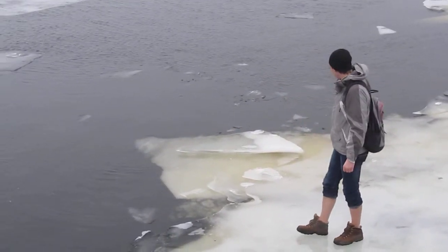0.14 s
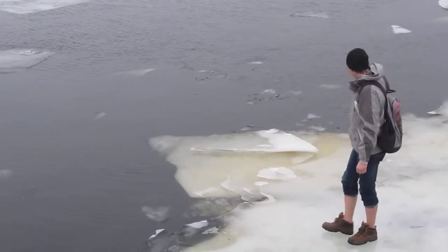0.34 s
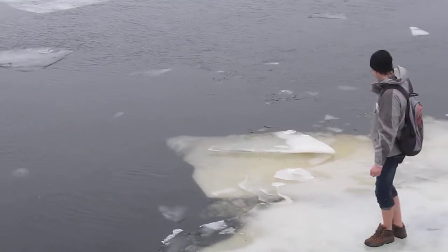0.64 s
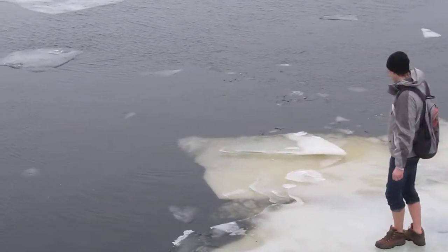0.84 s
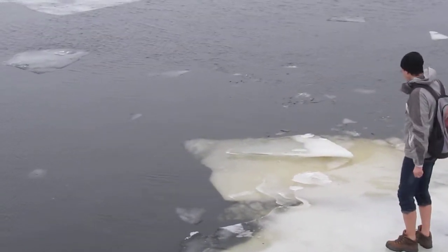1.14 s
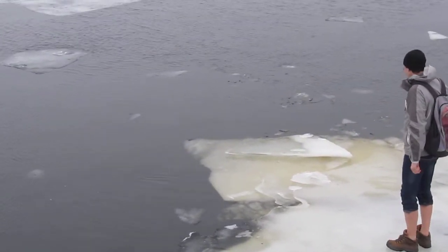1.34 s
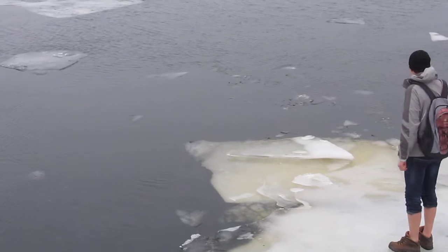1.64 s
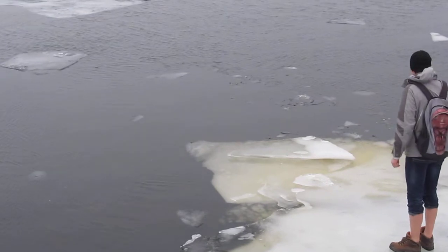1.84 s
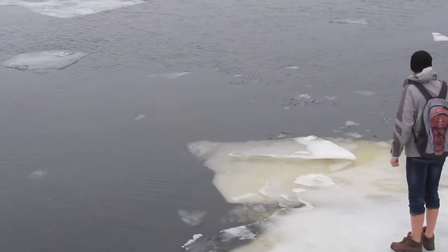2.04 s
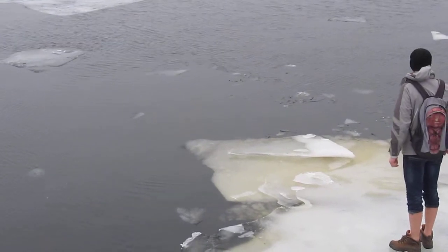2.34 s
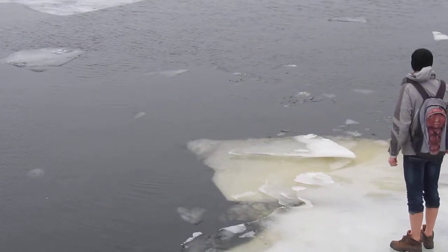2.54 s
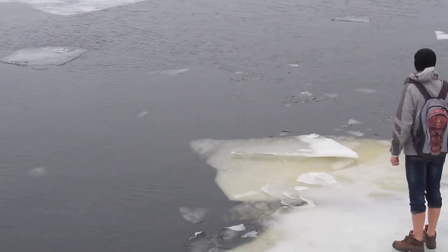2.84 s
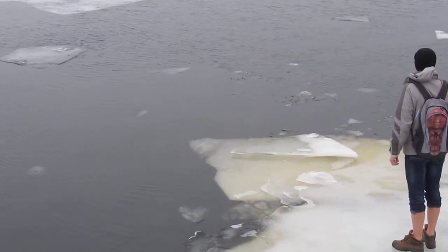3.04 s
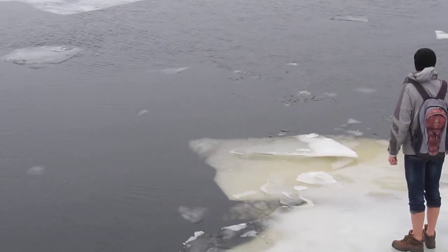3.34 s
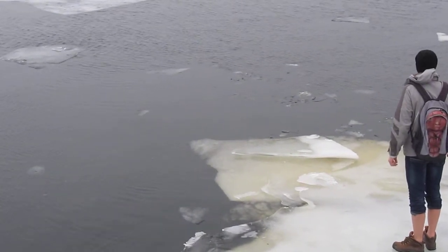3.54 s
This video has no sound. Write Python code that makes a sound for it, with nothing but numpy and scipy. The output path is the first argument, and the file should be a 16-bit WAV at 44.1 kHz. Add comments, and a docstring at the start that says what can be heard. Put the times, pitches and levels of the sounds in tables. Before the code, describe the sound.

Fluttering wind rumble with dull pops strikes the microphone throughout, strongest around the middle and again near the end. Outdoors by an icy river, soft hiss continues beneath, with barely audible gritty scuffs and ticks of ice underfoot.

```python
"""A light, gusty wind blows straight onto two microphone ports on an icy river bank.
At each port gusts and flurries shape coloured noise, and single eddies are short swings of pressure.
Underneath lie distant water and camera hiss as steady noise, and a thin camera whine of sine tones.
A walker's boots scuff the granular ice as gritty noise, and a few ice grains tick as short rings."""
import sys
import numpy as np
from scipy import signal
from scipy.fft import rfft, irfft
from scipy.io import wavfile

SR = 44100
rng = np.random.default_rng(int(sys.argv[2]) if len(sys.argv) > 2 else 0)


def log_audio(samples):
    """Write samples as a 16-bit WAV file to the path given in sys.argv[1]."""
    # one column per channel
    frames = np.atleast_2d(samples).T
    # limit to full scale, then quantise
    limited = np.clip(frames, -1, 1)
    pcm = np.round(limited * 32767).astype(np.int16)
    wavfile.write(sys.argv[1], SR, pcm)


N = 162288
T = np.arange(N) / SR


def undb(db):
    """Decibels to gain."""
    return 10 ** (np.asarray(db) / 20)


def noise():
    """White noise."""
    return rng.standard_normal(N)


def colour(x, points):
    """Shape a sound by (f/Hz, level/dB) points; white noise keeps its power."""
    hz, db = np.array(points, float).T
    bin_hz = np.arange(N // 2 + 1) * SR / N + 1e-9  # the offset avoids log(0)
    gain = undb(np.interp(np.log(bin_hz), np.log(hz), db))
    gain /= np.sqrt(np.mean(gain ** 2))
    return irfft(rfft(x) * gain, N)


def envelope_db(points):
    """Level in dB at every sample, joined by straight lines between (t/s, level/dB) points."""
    return np.interp(T, *np.array(points).T)


def flutter(spread_db, rate_per_s):
    """A quick random swelling of mean power 1."""
    knots = np.clip(rng.standard_normal(4096), -1.6, 1.6)
    gain = undb(spread_db * np.interp(T * rate_per_s, np.arange(len(knots)), knots))
    return gain / np.sqrt(np.mean(gain ** 2))


def near(at):
    """The samples within 20 ms of a moment."""
    return slice(*np.searchsorted(T, [at - .02, at + .02]))


CLEARING_S = 0.002  # time for which a strong eddy displaces the other turbulence


def clearing(port):
    """Gain of the turbulence, which gives way while a strong eddy covers the port."""
    gain = np.ones(N)
    for at, side, db, hz in STRONG_EDDIES:
        if side == port:
            span = near(at)
            gain[span] *= 1 - np.exp(-((T[span] - at) / CLEARING_S) ** 2)
    return gain


# slow gusts at each port, before the rumble and swirl gains: t/s, level/dB
GUSTS = {"L": [(0.0, -27), (0.24, -33), (0.62, -25), (0.94, -26.5), (1.12, -19.5), (1.32, -27.5),
         (1.48, -24), (1.58, -27), (1.94, -18), (2.04, -28.5), (2.16, -23.5), (2.35, -25.5), (2.495, -15),
         (2.57, -21.5), (2.83, -31), (2.99, -22), (3.51, -25), (3.68, -24)], "R": [(0.0, -36.5),
         (0.08, -23), (0.3, -32), (0.62, -32.5), (0.74, -25), (1.0, -20.5), (1.22, -26), (1.46, -14),
         (1.52, -22.5), (2.43, -24), (2.55, -22), (2.99, -26), (3.17, -27), (3.255, -19), (3.31, -26.5),
         (3.49, -29.5), (3.57, -21), (3.68, -28.5)]}
# short flurries of turbulence, before the flurry gain: t/s, port, level/dB, length/s
FLURRIES = [(0.087, "L", -25.5, 0.044), (1.146, "L", -30, 0.046), (1.473, "L", -31.5, 0.038),
            (1.825, "L", -29, 0.027), (2.788, "L", -24.5, 0.019), (2.933, "L", -26, 0.016),
            (0.067, "R", -26.5, 0.036), (0.226, "R", -25.5, 0.012), (0.354, "R", -26, 0.019),
            (0.428, "R", -20, 0.012), (0.532, "R", -22, .009), (0.74, "R", -27.5, 0.013),
            (0.908, "R", -24, 0.064), (1.013, "R", -33, 0.054), (1.423, "R", -17, 0.041),
            (1.448, "R", -11.5, 0.012), (1.849, "R", -24, 0.044), (2.034, "R", -26.5, 0.036),
            (2.206, "R", -22.5, 0.014), (2.308, "R", -22, 0.024), (2.59, "R", -16.5, 0.0095),
            (2.695, "R", -13.5, 0.018), (3.297, "R", -27.5, 0.011), (3.434, "R", -29.5, 0.03),
            (3.6, "R", -17, 0.016)]
# relative colour of the rumble at each port: f/Hz, level/dB per Hz
RUMBLE_COLOUR = {"L": [(15, -36.5), (40, -2.5), (85, 5.5), (170, 3), (300, -10), (550, -22.5), (900, -26),
                 (1400, -36.5), (2500, -63.5), (6000, -94.5)], "R": [(15, -33.5), (40, -18), (85, -6),
                 (200, -5.5), (330, -13.5), (550, -34), (900, -47.5), (1400, -47), (2500, -69.5),
                 (6000, -93)]}
# relative colour of swirl, flurries and wakes: f/Hz, level/dB per Hz
SWIRL_COLOUR = [(30, -32), (120, 1.5), (300, 5), (550, -3), (850, -10.5), (1300, -27), (2000, -40),
                (3500, -71.5)]
RUMBLE_DB, SWIRL_DB, FLURRY_DB = -1.5, -14, 3  # gains on the tabled levels
RUMBLE_FLUTTER_DB, SWIRL_FLUTTER_DB, FLUTTER_PER_S = 5.5, 7.5, 170
WAKE_DB, WAKE_S = -10, 0.0096  # turbulence trailing a strong eddy: level under its peak, decay time


def wind(port):
    """Gusts drive a deep rumble and a brighter, fitful swirl, which flurries and eddy wakes swell."""
    gust = undb(envelope_db(GUSTS[port]))
    rumble = colour(noise() * gust * flutter(RUMBLE_FLUTTER_DB, FLUTTER_PER_S), RUMBLE_COLOUR[port])
    swirl_power = (undb(SWIRL_DB) * gust) ** 2
    for at, side, db, length in FLURRIES:
        if side == port:
            swirl_power += undb(db + FLURRY_DB) ** 2 * np.exp(-(2 * (T - at) / length) ** 2)
    for at, side, db, hz in STRONG_EDDIES:
        if side == port:
            decay = np.exp(-2 * abs(T - at) / WAKE_S)
            swirl_power += undb(db + WAKE_DB) ** 2 * (T > at) * decay
    fitful = noise() * np.sqrt(swirl_power) * flutter(SWIRL_FLUTTER_DB, FLUTTER_PER_S)
    swirl = colour(fitful, SWIRL_COLOUR)
    return (undb(RUMBLE_DB) * rumble + swirl) * clearing(port)


# relative colour of the hush at each port: f/Hz, level/dB per Hz
HUSH_COLOUR = {"L": [(200, 10.5), (900, 0.5), (1600, -4), (2020, 3.5), (2290, -10.5), (2560, -2.5),
               (2860, -21), (3150, -12), (3400, -13.5), (3700, -9.5), (4050, -24.5), (4700, -21.5),
               (5100, -16), (5400, -5.5), (5620, -22), (5980, -12), (6350, -28.5), (6800, -30.5),
               (8500, -36), (10600, -43), (11400, -30.5), (13400, -39), (15500, -65.5)], "R": [(200, 7),
               (900, -9), (1350, -5.5), (1700, -11), (2200, -14), (3250, -21), (3750, -14), (4300, -23),
               (4900, -31.5), (5450, -18.5), (6200, -40.5), (6800, -32), (9500, -37), (11500, -36),
               (13400, -40), (15500, -63)]}
# slow swell added to the hush level: t/s, level/dB
HUSH_SWELL = [(0, -5), (.6, -2), (1.18, 2), (1.28, 0.5), (1.42, 1.5), (1.66, -0.5), (2.35, 2.5), (3.68, .5)]
HUSH_DB = {"L": -45.5, "R": -48.5}  # before the swell
HUSH_SHARED = 0.23  # share of the power common to both ports
HUSH_FLICKER_DB, HUSH_FLICKER_PER_S = 1.2, 45


def hush(port, river):
    """Distant water and the camera's own hiss, flickering a little, coloured by the port's resonances."""
    mixed = np.sqrt(HUSH_SHARED) * river + np.sqrt(1 - HUSH_SHARED) * noise()
    flickering = mixed * flutter(HUSH_FLICKER_DB, HUSH_FLICKER_PER_S)
    level = undb(HUSH_DB[port] + envelope_db(HUSH_SWELL))
    return level * colour(flickering, HUSH_COLOUR[port])


# camera whine at the right port: f/Hz, RMS level/dB
WHINE_TONES = [(7867, -81.5), (8107, -90.5), (8167, -89), (9834, -92.5), (11801, -88.5)]
WHINE_LEFT_DB = -11  # left port relative to right


def whine():
    """Thin steady sine tones from the camera, stronger on the right."""
    tones = np.zeros(N)
    for hz, db in WHINE_TONES:
        tones += undb(db) * np.sqrt(2) * np.sin(2 * np.pi * (hz * T + rng.random()))
    return np.array([undb(WHINE_LEFT_DB) * tones, tones])


EDDY_DAMPING, EDDY_LEAN = 4.33, 0.036  # per cycle; cycles by which the swing leans towards the push


def swing(cycles):
    """Suction and then a stronger push: about one cycle, with peak 1."""
    wave = np.sin(2 * np.pi * cycles) / np.cosh(EDDY_DAMPING * (cycles - EDDY_LEAN))
    return wave / abs(wave).max()


# small eddies: level over the gust and its scatter, pitch and its scatter
SMALL_EDDY_DB, SMALL_EDDY_SCATTER_DB, SMALL_EDDY_HZ, SMALL_EDDY_OCTAVES = 0, 5, 328, 0.31


def small_eddies(port, count=170):
    """Rows (t/s, level/dB, f/Hz) of lesser vortices, whose level follows the gust that carries them."""
    at = (np.arange(count) + rng.random(count)) / count * T[-1]
    size, pitch = np.clip(rng.standard_normal((count, 2)), -1.6, 1.6).T
    gust_db = np.interp(at, *np.array(GUSTS[port]).T)
    db = gust_db + SMALL_EDDY_DB + SMALL_EDDY_SCATTER_DB * size
    return list(zip(at, db, SMALL_EDDY_HZ * 2 ** (SMALL_EDDY_OCTAVES * pitch)))


# single strong eddies that strike a port: t/s, port, peak level of the swing/dB, f/Hz
STRONG_EDDIES = [(1.135, "L", -14, 383), (1.4744, "L", -11, 450), (1.5094, "L", -4, 422),
                 (1.818, "L", -14, 420), (1.845, "L", -18.5, 418), (2.0846, "L", -10.5, 365),
                 (2.155, "L", -6.5, 310), (2.4653, "L", -11.5, 500), (2.496, "L", -3.5, 187),
                 (2.504, "L", -11.5, 633), (0.068, "R", -8.5, 300), (.125, "R", -7, 480),
                 (0.242, "R", -11.5, 217), (0.4262, "R", -17.5, 563), (.569, "R", -9, 386),
                 (0.732, "R", -12.5, 410), (0.9009, "R", -10, 456), (1.061, "R", -14.5, 414),
                 (1.403, "R", -9, 556), (1.414, "R", -13, 680), (1.432, "R", -11, 430),
                 (1.4496, "R", -9, 290), (1.467, "R", -4, 380), (1.5872, "R", -5.5, 420),
                 (1.7125, "R", -7.5, 457), (1.809, "R", -9.5, 460), (2.0237, "R", -8.5, 326),
                 (2.172, "R", -7.5, 348), (2.2242, "R", -11.5, 400), (2.398, "R", -12.5, 530),
                 (2.541, "R", -2.5, 455), (2.5589, "R", -9, 400), (2.671, "R", -4.5, 510),
                 (2.6914, "R", -3, 410), (2.7518, "R", -8, 317), (3.2452, "R", -14, 710),
                 (3.2456, "R", 1, 195.2), (3.2645, "R", -6.5, 310), (3.355, "R", -12.5, 382),
                 (3.5935, "R", -3, 640)]
EDDY_FRONT_DB, EDDY_FRONT_HZ = -24, 1200  # level relative to the swing


def eddies(port):
    """A passing vortex gives one soft swing of pressure with a faint steep front at its middle."""
    out = np.zeros(N)
    strong = [(at, db, hz) for at, side, db, hz in STRONG_EDDIES if side == port]
    for at, db, hz in strong + small_eddies(port):
        span = near(at)
        age = T[span] - at
        front = undb(EDDY_FRONT_DB) * swing(age * EDDY_FRONT_HZ)
        out[span] += undb(db) * (swing(age * hz) + front)
    return out


# boots scuffing the granular ice: t/s, level/dB, length/s
SCUFFS = [(0.293, -60, 0.022), (1.136, -60.5, 0.035), (1.39, -61, 0.06), (2.296, -62, .04),
          (2.916, -55, 0.034)]
# relative colour of the scuffs: f/Hz, level/dB per Hz
SCUFF_COLOUR = [(1000, -5), (3000, 13.5), (5000, 3.5), (7500, -0.5), (13000, -13), (15500, -23.5)]
SCUFF_GRAIN_DB, SCUFF_GRAINS_PER_S = 7, 400


def scuffs():
    """A faint gritty crunch of fluttering noise as the walker shifts weight."""
    press = np.zeros(N)
    for at, db, length in SCUFFS:
        press += undb(db) * np.exp(-2 * ((T - at) / length) ** 2)
    return colour(noise() * press * flutter(SCUFF_GRAIN_DB, SCUFF_GRAINS_PER_S), SCUFF_COLOUR)


# ice grains cracking underfoot, before the ring and crack gains: t/s, level/dB at the right port, ring f/Hz
TICKS = [(1.077, -35, 4700), (1.095, -46.5, 5800), (1.339, -51.5, 7440), (1.37, -47.5, 7000),
         (2.829, -51, 8300), (2.899, -48, 4300), (2.92, -45, 7200), (2.943, -48, 8200)]
TICK_DECAY_S, TICK_CRACK_DB = .0012, 3
TICK_OCTAVES = .6  # reach of the crack's band to each side of the ring


def ice_ticks(left_db=-3):
    """Each grain breaks with a tiny crack spread around its short ring, a little to the right."""
    out = np.zeros((2, N))
    age = T[:1024]
    for at, db, hz in TICKS:
        edges = [hz / 2 ** TICK_OCTAVES, hz * 2 ** TICK_OCTAVES]
        band = signal.butter(2, edges, "bandpass", fs=SR, output="sos")
        crack = undb(TICK_CRACK_DB) * signal.sosfilt(band, rng.standard_normal((2, len(age))))
        ring = np.sin(2 * np.pi * hz * age) / 2
        start = int(at * SR)
        out[:, start:start + len(age)] += undb(db) * np.exp(-age / TICK_DECAY_S) * (ring + crack)
    return out * np.array([[undb(left_db)], [1]])


def scene():
    """Unrelated wind at the two ports over the quiet river bank."""
    river = noise()
    ports = [wind(port) + hush(port, river) + eddies(port) + scuffs() for port in "LR"]
    return np.array(ports) + whine() + ice_ticks()


OVERLOAD_HZ, OVERLOAD_DB = 8500, 12  # lower edge and gain of the overload click
TOP_HZ = 15750


def record(dry):
    """Peaks beyond full scale overload the recorder, which adds a thin click; the top is cut."""
    clipped = np.clip(dry, -1, 1)
    click_band = signal.butter(4, OVERLOAD_HZ, "highpass", fs=SR, output="sos")
    click = signal.sosfilt(click_band, clipped - dry)
    top_cut = signal.ellip(8, .2, 70, TOP_HZ, fs=SR, output="sos")
    return signal.sosfilt(top_cut, clipped + undb(OVERLOAD_DB) * click)


dry = scene()
out = record(dry)
log_audio(out)
```